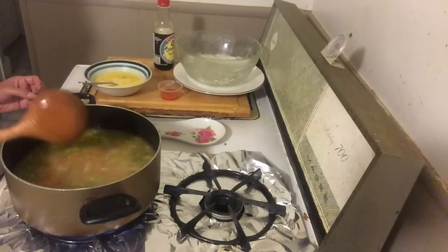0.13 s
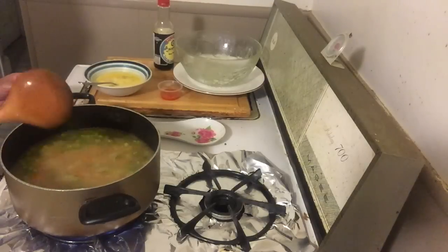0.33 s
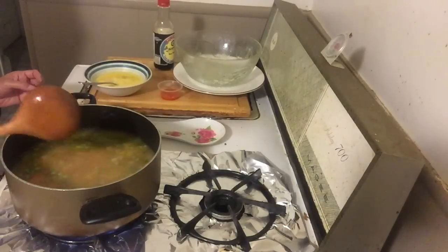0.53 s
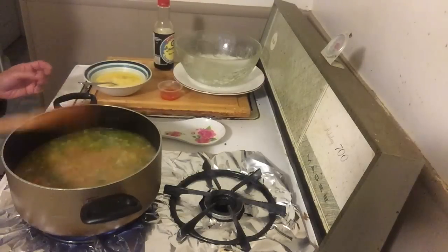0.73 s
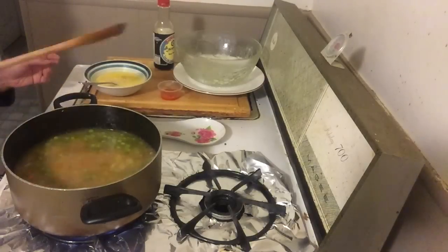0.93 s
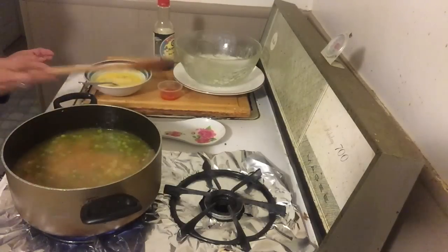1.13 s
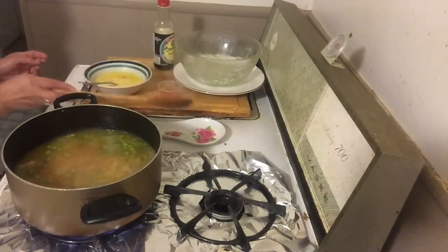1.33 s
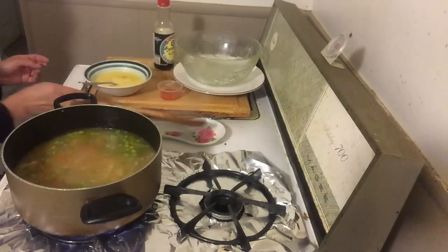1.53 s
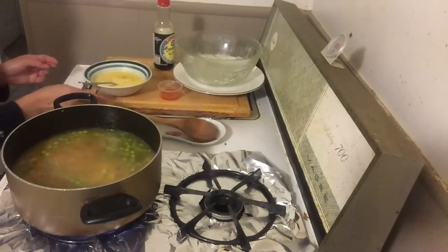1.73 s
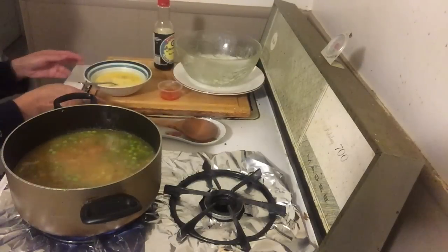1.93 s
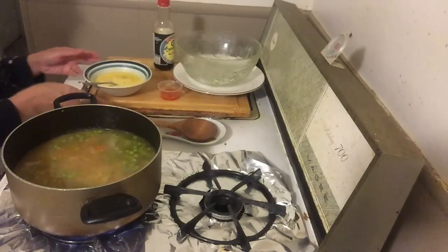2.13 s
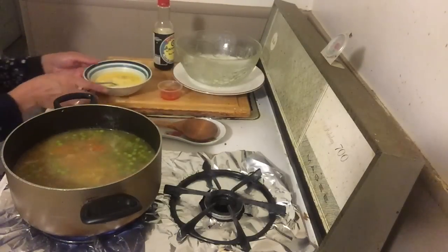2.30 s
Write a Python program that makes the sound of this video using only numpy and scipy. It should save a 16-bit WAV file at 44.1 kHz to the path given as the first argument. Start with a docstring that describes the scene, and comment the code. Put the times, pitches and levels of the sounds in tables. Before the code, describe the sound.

Wooden spoon on a full pot: three short, thuddy knocks at about 0.28, 0.52 and 0.69 s, slightly louder each time, with brief room ring. Faint, roughly even ticks follow to about 1.3 s over soft burner hiss and unsteady low rumble. At 1.7 s the spoon clacks sharply onto a ceramic rest; around 2.1-2.16 s a dish gives a quieter clinking cluster. Boxy midrange microphone colour.

```python
"""Spoon and cooking pot

A wooden spoon knocks three times on the rim of a full pot, is laid on a ceramic rest, and a dish is nudged.
Each contact: decaying sine modes (clack), a dense noise ring of stove and kitchen, a faint treble rattle.
Faint, roughly even ticks; hum and rumble swell after the knocks over burner hiss and a treble floor.
The microphone resonates near 2 kHz, so every contact sounds strong there; nothing passes 15.75 kHz."""
import sys
import numpy as np
from scipy import signal
from scipy.fft import rfft, irfft, next_fast_len
from scipy.io import wavfile
from scipy.ndimage import map_coordinates

SR = 44100
rng = np.random.default_rng(int(sys.argv[2]) if len(sys.argv) > 2 else 0)


def to_wav(sig):
    """Store sig (one row per channel, or 1-D mono) as 16-bit WAV at the path in sys.argv[1].

    Samples outside -1..1 are clipped; the rate is SR.
    """
    pcm = np.clip(np.atleast_2d(sig), -1, 1) * 32767
    pcm = np.round(pcm).astype(np.int16)
    wavfile.write(sys.argv[1], SR, pcm.T)  # frames by channels


N = 104208

# Contacts: [t/s, level/dB, 2 kHz resonance boost/dB, ring offset/dB, rattle re level/dB]
SPOON_KNOCKS = [(0.283, -21, -12, -7, -65), (0.5233, -18, 3.5, -5.5, -58), (0.6936, -16.5, 0, -6.5, -55)]
SPOON_SET_DOWN = [(1.7048, -14.5, 0, -2, -65.5), (1.7112, -19, 0.012, -6, -66),
                  (1.738, -27.5, 0.02, -13, -66)]
DISH_NUDGE = [(2.1050, -29, 4, 2.5, -50), (2.1262, -21.5, 0.5, 0.5, -46), (2.1345, -29.5, 3, -1, -53),
              (2.141, -30.5, 2.5, -28, -44), (2.157, -29.5, 0.0085, -4.5, -63)]
FAINT_TICKS = [(.333, -61, 3, -5, -42), (.418, -63.5, 11, 6, -42), (.4475, -50.5, -0.5, 1, -36),
               (.685, -50.5, 1, 4, -40), (.805, -39, -3, -5, -40), (.931, -46.5, 4, -1, -31.5),
               (1.045, -45.5, 2.5, -0.5, -39), (1.161, -48.5, 2.5, -0.5, -41), (1.283, -62.5, 10, 5, -44),
               (1.533, -65.5, 8.5, 3, -44), (1.856, -53, 11, 0, -50)]

# Modes of each contact, microphone resonance included: [nominal f/Hz, nominal level/dB, t60/s, build-up/s]
POT_MODES = [(215, 8, 0.043, 0.0065), (235, -24, 0.055, 0.0031), (616, -8.5, 0.027, 0.0015),
             (987, -5, 0.013, 0.00068), (938, -18, 0.2, 0.02), (987, -13, 0.09, 0.015),
             (1006, -17, 0.16, 0.031), (1081.4, -9, 0.086, 0.016), (1370, -28, 0.39, 0.0095),
             (1996, 1.5, 0.015, 0.0012), (1935, -23, 0.38, 0.026), (2520, -13.5, 0.019, 0.00096),
             (3170, -31.5, 0.021, 0.0013)]
REST_MODES = [(221.5, -11.5, 0.17, 0.0028), (324.5, -26.5, 0.36, 0.008), (432, -15.5, 0.13, 0.016),
              (521.6, -12.5, 0.065, 0.0045), (600, -23, 0.39, .015), (974, -23.5, 0.27, 0.0025),
              (1132, -15, 0.15, 0.0036), (1483, -21.5, .2, 0.007), (2013, 4, 0.029, 0.0018),
              (1992, -21, 0.44, 0.0086), (2042, -21.5, 0.45, 0.0068), (2164, 5.5, 0.02, 0.0021),
              (3022, -20, .04, 0.004), (3620, -38, 0.14, 0.0024)]
DISH_MODES = [(368.2, -13, 0.31, 0.0014), (808, -3.5, 0.046, 0.0032), (1236, -17, 0.3, .003),
              (1341, -19, 0.29, 0.0025), (1466, -1, 0.036, 0.0013), (2028, 4, 0.018, 0.0011),
              (2043, -11, 0.22, 0.0053), (2300, 0.5, .016, 0.00079), (2990, -12.5, 0.014, 0.00067),
              (6440, -21.5, 0.011, 0.00069)]
TICK_MODES = [(730, -5.5, 0.06, .006), (1500, -7.5, 0.058, 0.002), (1705, 6, 0.055, 0.014),
              (2006, 12, 0.036, 0.0039), (2170, -1, 0.044, 0.0036), (2765, 1.5, 0.044, 0.0052)]

# Colour of the dense ring after each contact: [f/Hz, relative level/dB]
POT_RING_COLOUR = [(88, -21), (150, -4), (233, -10), (412, -19), (648, -10), (747, -13.5), (884, -4.5),
                   (1030, -4.5), (1130, -9.5), (1390, -11.5), (1600, -20.5), (2000, -13), (3310, -40.5),
                   (4300, -66), (7280, -120)]
REST_RING_COLOUR = [(88, -47.5), (150, -13), (221, -4.5), (290, -29), (326, -4), (396, -13), (615, 0),
                    (673, -11.5), (1120, -3), (1540, -18.5), (2080, -1), (2520, -23), (3310, -31.5),
                    (4300, -53), (7280, -120)]
DISH_RING_COLOUR = [(88, -55), (150, -14.5), (199, -11), (276, -8.5), (298, 0), (362, -22.5), (451, -4.5),
                    (481, -21), (639, -3), (747, -9), (1060, -4.5), (1540, -13), (2050, -6), (3310, -29),
                    (4300, -51.5), (7280, -120)]
TICK_RING_COLOUR = [(400, -56.5), (800, -14), (1500, -14.5), (2000, 3), (2400, -17.5), (2800, -18),
                    (3500, -34)]

# Treble rattle of spoon and dish contacts, then of ticks: [f/Hz, relative level/dB]
CONTACT_RATTLE_COLOUR = [(4000, -53.5), (5000, -13), (5700, -4), (6400, -2), (7200, -15), (8400, -9),
                         (9500, -18.5), (11000, -60)]
TICK_RATTLE_COLOUR = [(6000, -58), (8000, -15.5), (8400, 0), (8800, -24), (11000, -50)]

# Decay time of rings and rattles: [f/Hz, t60/s]
RING_DECAY = [(150, 0.63), (400, 0.37), (1000, 0.42), (2000, 0.4), (3500, 0.32), (7000, 0.087)]

# Hum level before wander: [t/s, rms level/dB]
HUM_LEVEL = [(0.0, -93), (0.1, -57.5), (0.17, -110), (0.24, -57.5), (0.37, -44.5), (0.47, -60), (0.53, -48),
             (0.6, -47.5), (0.64, -61.5), (0.7, -47.5), (0.77, -40.5), (0.87, -74), (0.93, -57.5),
             (1.02, -75), (1.24, -63.5), (1.27, -77), (1.58, -50), (1.68, -61.5), (1.71, -52), (1.93, -83),
             (2.18, -58.5), (2.21, -72), (2.25, -56), (2.36, -75)]
# Rumble tone before wander: [t/s, f/Hz, rms level/dB]
RUMBLE_TRACK = [(0.0, 58.8, -51), (0.1, 58.6, -71), (0.14, 57.8, -78.5), (0.35, 52.3, -52),
                (0.46, 59.6, -70), (0.48, 60.4, -57), (0.52, 57.25, -64), (0.6, 53.3, -42),
                (0.64, 53.4, -52.5), (0.71, 52.0, -57), (0.77, 51.3, -38), (0.8, 54.4, -50),
                (0.89, 65.8, -53), (0.91, 65.3, -55.5), (1.05, 49.5, -70.5), (1.13, 45.03, -56.5),
                (1.34, 55.8, -66), (1.43, 57.74, -61.5), (1.51, 62.8, -65), (1.55, 64.2, -47),
                (1.61, 57, -63), (1.66, 52.8, -55), (1.72, 56.96, -64.5), (1.77, 59.1, -49.5),
                (1.8, 62.6, -58), (1.83, 63.0, -64.5), (2.0, 56.2, -55.5), (2.06, 55.6, -78),
                (2.16, 55.5, -54), (2.36, 53.1, -66)]
# Colour of the noise bed under the rumble tone: [f/Hz, relative level/dB]
RUMBLE_BED_COLOUR = [(15, -42.5), (30, -33.5), (42, -9), (54, -18.5), (66, -9), (85, -16.5), (110, -9.5),
                     (160, -46.5), (250, -85.5)]
# Burner hiss colour: [f/Hz, relative level/dB]
HISS_COLOUR = [(88, -28), (150, -5), (169, -16.5), (242, -18), (348, -24), (445, -20.5), (561, -26.5),
               (622, -17.5), (699, -24.5), (1060, -22.5), (1480, -34), (1940, -16.5), (2650, -33),
               (3300, -37.5), (4290, -67.5), (7260, -120)]
# Burner hiss level before flicker: [t/s, rms level/dB]
HISS_TRACK = [(0, -67), (.25, -64.5), (.9, -61), (1.2, -66), (1.45, -64), (1.68, -62.5), (2.05, -64.5),
              (2.36, -68)]
# Treble floor colour: [f/Hz, relative level/dB]
FLOOR_COLOUR = [(2500, -31.5), (3300, 2), (4000, 1), (5000, -1.5), (6500, 1.5), (8000, -3), (9800, -4),
                (10400, -10.5), (11000, -6), (13000, -8.5), (15700, -8)]

RESONANCE_LOW_HZ, RESONANCE_HIGH_HZ = 1500, 2400  # modes in this band sit on the microphone's 2 kHz resonance
DETUNE = 0.006  # fractional pitch scatter of a mode from blow to blow
ECHO_DELAY_S, ECHO_DB, ECHO_HZ, ECHO_T60_S, ECHO_RISE_S = 0.046, -4.5, 190, 0.04, 0.0045
RATTLE_RISE_S = 0.0009
HUM_HZ = 135.5
RUMBLE_BED_DB, FLOOR_DB = -62, -76.5
BAND_LIMIT_HZ = 15750


def amp(db):
    """dB to gain."""
    return 10 ** (np.asarray(db) / 20)


def unit(x):
    """Scale to rms 1."""
    return x / np.sqrt(np.mean(x ** 2) + 1e-20)


def along(points, hz):
    """Interpolate (f/Hz, value) points on a log frequency axis."""
    f, v = np.transpose(points)
    return np.interp(np.log(hz + 1), np.log(f + 1), v)


def curves(rows):
    """Interpolate each column after the time to one value per sample."""
    t_s, *columns = np.transpose(rows)
    return [np.interp(np.arange(N) / SR, t_s, c) for c in columns]


def wobble(knots_per_s):
    """Smooth random curve: spline through Gaussian knots."""
    knots = rng.standard_normal(int(N * knots_per_s / SR) + 4)
    return map_coordinates(knots, [np.arange(N) * knots_per_s / SR])


def wandering_tone(hz, level_db):
    """Sine of varying frequency and rms level; phase is the running sum of frequency."""
    phase = 2 * np.pi * np.cumsum(hz) / SR
    return np.sqrt(2) * amp(level_db) * np.sin(phase)


def noise(colour):
    """Steady noise of rms 1, coloured in the frequency domain."""
    m = next_fast_len(N)
    gain = amp(along(colour, np.fft.rfftfreq(m, 1 / SR)))
    spectrum = rfft(rng.standard_normal(m)) * gain
    return unit(irfft(spectrum, m)[:N])


def build_up(t, rise_s):
    """Smooth onset from 0 to 1."""
    return 1 - np.exp(-(t / rise_s) ** 2)


def rumble():
    """Wandering low tone, swelling after the knocks, over a bed of low noise."""
    hz, level_db = curves(RUMBLE_TRACK)
    tone = wandering_tone(hz + 3 * wobble(4.8), level_db + 1.1 * wobble(15))
    bed = amp(RUMBLE_BED_DB + 2.5 * wobble(4.1)) * noise(RUMBLE_BED_COLOUR)
    return tone + bed


def burner_hiss():
    """Coloured noise of the burner, flickering slightly in level."""
    level_db, = curves(HISS_TRACK)
    return amp(level_db + 0.38 * wobble(3.4)) * noise(HISS_COLOUR)


def treble_floor():
    """Steady treble noise."""
    return amp(FLOOR_DB) * noise(FLOOR_COLOUR)


def hum():
    """Low unsteady tone, perhaps the stove top resonating."""
    level_db, = curves(HUM_LEVEL)
    return wandering_tone(HUM_HZ + 1.54 * wobble(8.27), level_db + 0.31 * wobble(25))


def clack(modes, resonance_db, scatter_db):
    """Sum of decaying sine modes, each with its own onset and random level and pitch scatter."""
    t = np.arange(SR // 2) / SR
    total = np.zeros(len(t))
    for hz, level_db, t60_s, rise_s in modes:
        boost_db = resonance_db * (RESONANCE_LOW_HZ < hz < RESONANCE_HIGH_HZ)
        level_db = level_db + boost_db + scatter_db * rng.standard_normal()
        mode_hz = hz * (1 + DETUNE * rng.standard_normal())
        envelope = amp(level_db - 60 * t / t60_s) * build_up(t, rise_s)
        total += envelope * np.sin(2 * np.pi * mode_hz * t)
    return total


def ring(colour, rise_s):
    """Fresh dense noise tail: it builds up, and each frequency dies at its own rate."""
    n = SR // 2
    hz, frame_s, z = signal.stft(rng.standard_normal(n), SR, nperseg=512)
    colour_db = along(colour, hz)[:, None]
    decay_db = 60 * frame_s / along(RING_DECAY, hz)[:, None]
    x = signal.istft(z * amp(colour_db - decay_db), SR, nperseg=512)[1][:n]
    x = x / np.sqrt(np.mean(x[:SR // 20] ** 2))  # rms 1 over first 50 ms, before build-up
    return x * build_up(np.arange(n) / SR, rise_s)


def contacts(events, modes, ring_colour, rattle_colour, ring_db, rise_s, scatter_db):
    """Each contact excites the object's modes and starts its ring and a faint treble rattle."""
    out = np.zeros(N + SR)
    for t_s, level_db, resonance_db, ring_offset_db, rattle_db in events:
        hit = clack(modes, resonance_db, scatter_db)
        hit += amp(ring_db + ring_offset_db) * ring(ring_colour, rise_s)
        hit += amp(rattle_db) * ring(rattle_colour, RATTLE_RISE_S)
        out[round(t_s * SR):][:len(hit)] += amp(level_db) * hit
    return out[:N]


def spoon_knocks():
    """Wooden spoon on the rim of the full pot: short pot modes plus ring."""
    return contacts(SPOON_KNOCKS, POT_MODES, POT_RING_COLOUR, CONTACT_RATTLE_COLOUR,
                    ring_db=-10.5, rise_s=0.0058, scatter_db=-2.17)


def thud_echo():
    """Low thud of each knock returns once, as a decaying sine with a soft onset."""
    out, t = np.zeros(N + SR), np.arange(SR // 4) / SR
    for t_s, level_db, *_ in SPOON_KNOCKS:
        envelope = amp(level_db + ECHO_DB - 60 * t / ECHO_T60_S) * build_up(t, ECHO_RISE_S)
        start = round((t_s + ECHO_DELAY_S) * SR)
        out[start:][:len(t)] += envelope * np.sin(2 * np.pi * ECHO_HZ * t)
    return out[:N]


def ticking():
    """Faint ticks: short decaying modes and a ring, with a narrow treble rattle."""
    return contacts(FAINT_TICKS, TICK_MODES, TICK_RING_COLOUR, TICK_RATTLE_COLOUR,
                    ring_db=-14, rise_s=0.0044, scatter_db=1.2)


def spoon_set_down():
    """Spoon laid on the ceramic rest: three contacts excite the rest's modes."""
    return contacts(SPOON_SET_DOWN, REST_MODES, REST_RING_COLOUR, CONTACT_RATTLE_COLOUR,
                    ring_db=-13, rise_s=0.003, scatter_db=3.2)


def dish_nudge():
    """Nudged dish: a quick cluster of contacts excites its modes."""
    return contacts(DISH_NUDGE, DISH_MODES, DISH_RING_COLOUR, CONTACT_RATTLE_COLOUR,
                    ring_db=-12.5, rise_s=0.0045, scatter_db=1.5)


def scene():
    """Four kinds of contact over rumble, hiss, treble floor and hum."""
    background = rumble() + burner_hiss() + treble_floor() + hum()
    struck = spoon_knocks() + thud_echo() + ticking() + spoon_set_down() + dish_nudge()
    return (background + struck)[None]


def record(dry):
    """Brick-wall low-pass: nothing is kept above the band limit."""
    m = next_fast_len(N + 4096)
    keep = np.fft.rfftfreq(m, 1 / SR) < BAND_LIMIT_HZ
    return irfft(rfft(dry, m) * keep, m)[:, :N]


dry = scene()
out = record(dry)
to_wav(out)
```